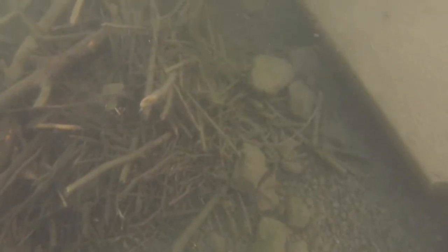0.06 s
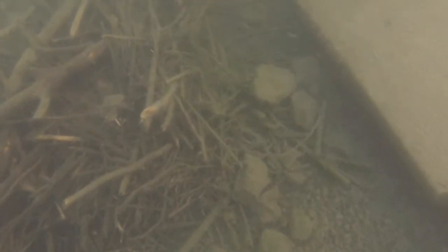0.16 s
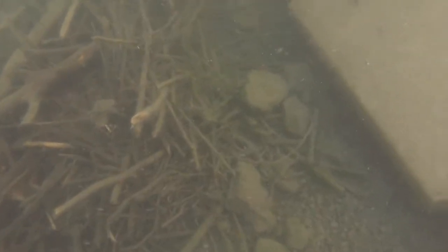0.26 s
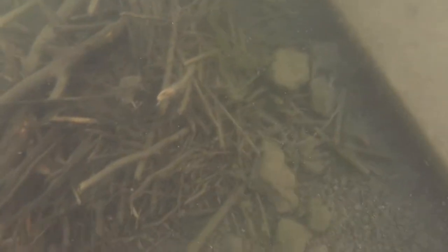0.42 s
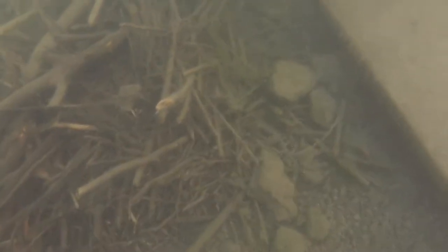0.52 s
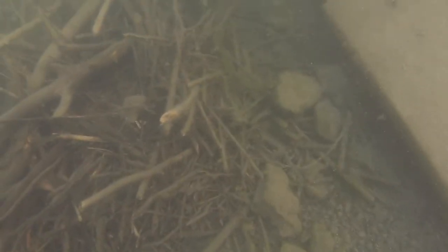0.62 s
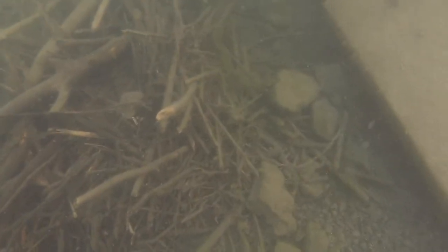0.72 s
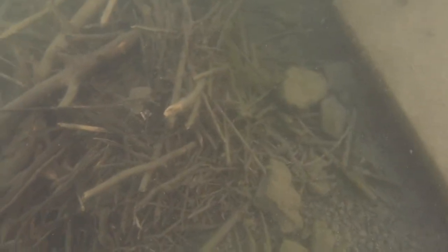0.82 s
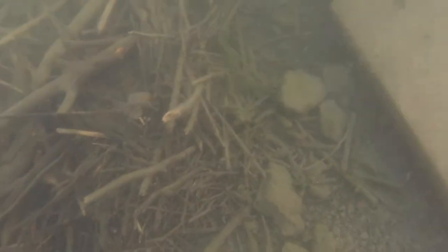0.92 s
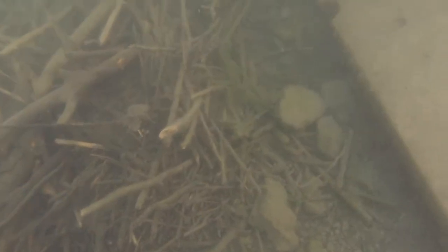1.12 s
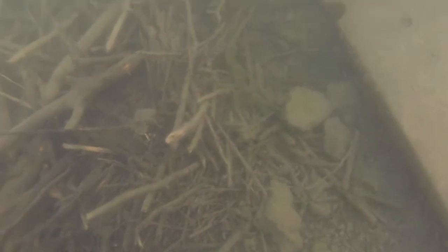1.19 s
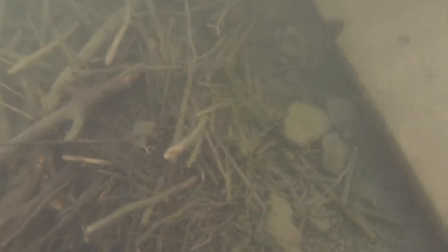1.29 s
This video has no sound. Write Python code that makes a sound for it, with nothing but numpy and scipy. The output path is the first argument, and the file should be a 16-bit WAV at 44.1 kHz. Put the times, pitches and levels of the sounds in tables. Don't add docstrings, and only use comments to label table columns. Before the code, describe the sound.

Hollow bubble glugs run quickly together and peak in a hard watery slap, then only weaker gurgles, light slosh and low pressure rumble remain, heard from inside a housing in shallow outdoor water.

```python
import sys
import numpy as np
from scipy import signal
from scipy.fft import rfft, irfft, next_fast_len
from scipy.io import wavfile
from scipy.ndimage import map_coordinates

SR = 44100
rng = np.random.default_rng(int(sys.argv[2]) if len(sys.argv) > 2 else 0)


def bounce(signal):
    frames = np.transpose(np.atleast_2d(signal))
    limited = np.clip(frames, -1, 1)
    pcm = np.round(limited * 32767).astype(np.int16)
    wavfile.write(sys.argv[1], SR, pcm)


def rack_gain(trim_db):
    fader = np.asarray(trim_db, float)
    return 10 ** (fader / 20)


N = 59535

# t/s, peak level/dB, f/Hz, swell time/s, time to fade by 60 dB/s
GLUGS = [(.081, -35, 659, 0.0014, 0.036), (.2135, -10, 688, 0.0024, 0.031),
         (.2275, -7.5, 664, 0.0019, 0.024), (.234, -12, 647, 0.0075, 0.077), (.247, -5.5, 700, 0.011, .014),
         (.265, -10, 786, 0.0058, 0.025), (.288, -23.5, 633, 0.0036, 0.08),
         (.312, -22.5, 664, 0.0067, 0.034), (.353, -14, 637, 0.0044, 0.058),
         (.381, -13.5, 643, 0.002, 0.021), (.3995, -4.5, 845, 0.0008, 0.031),
         (.4095, -4.5, 700, 0.00252, 0.0078), (.417, -17.5, 644, 0.0022, 0.088),
         (.498, -30, 810, 0.0019, 0.113), (.507, -25.5, 734, 0.007, 0.0079),
         (.534, -31.5, 706, 0.0024, 0.03), (0.756, -31.5, 564.3, 0.0073, 0.12),
         (.763, -26.5, 721, 0.009, 0.091), (.843, -25, 672, 0.0011, 0.052),
         (.851, -17, 663, 0.0045, 0.0041), (.865, -23, 700, 0.0037, 0.0084),
         (.872, -31.5, 685, 0.004, 0.085), (1.117, -21.5, 700, 0.0036, 0.012),
         (1.300, -25, 639, 0.0036, 0.015)]
# t/s, peak level/dB, f/Hz,
# swell time/s, 60 dB fade/s
BUBBLES = [(.002, -46.5, 719, 0.013, 0.034), (.150, -40, 746, 0.0067, 0.11),
           (0.2143, -22.5, 300, 0.0042, 0.088), (.408, -22, 290, 0.008, 0.12),
           (.270, -32.5, 1704, 0.00523, 0.011), (.300, -28, 300, 0.0071, 0.068),
           (0.374, -30, 119, 0.0042, 0.12), (0.549, -38.5, 444, 0.011, 0.073),
           (.693, -39.5, 560, 0.0031, 0.036), (.795, -36, 560, 0.011, 0.1), (.855, -39, 1746, 0.013, 0.093),
           (0.872, -27.5, 465, 0.0053, 0.099), (.988, -35, 520, 0.0029, 0.048),
           (1.047, -43, 197, 0.0032, 0.058), (1.092, -37.5, 530, 0.0012, 0.15),
           (1.117, -39.5, 1792, 0.0012, 0.08), (1.130, -44, 700, 0.0038, 0.022),
           (1.196, -33.5, 667, 0.00067, 0.019), (1.203, -31, 318.3, 0.012, 0.12),
           (1.23, -37.5, 1936, 0.00071, 0.097), (1.253, -34.5, 560, 0.0014, 0.099),
           (1.255, -35, 725, 0.0013, .05), (.528, -40.5, 285.5, 0.012, 0.14),
           (1.295, -37.5, 170, 0.0064, 0.03),
           (0.2133, -31, 1716, .002, .04), (0.23, -34, 1230, 0.0033, 0.034),
           (.232, -36, 1713, 0.0049, 0.065), (0.247, -30, 1350, 0.0031, 0.026),
           (.250, -32.5, 1720, 0.0047, 0.035), (.228, -20, 334, 0.0044, 0.06),
           (0.275, -20.5, 306, 0.0026, 0.031), (.258, -20, 865, 0.0023, 0.013),
           (.348, -20, 750, 0.0012, 0.061), (.349, -22, 3180, 0.0024, 0.004),
           (0.351, -27.5, 1405, .004, .04), (0.354, -22, 950, .004, .03), (.366, -22.5, 336, 0.0081, 0.023),
           (0.371, -40, 1210, 0.0045, 0.016), (.383, -23.5, 289, 0.004, 0.046),
           (.352, -26.5, 191, .006, 0.048), (.397, -10.5, 837, 0.0016, 0.021),
           (.399, -10.5, 560, 0.0039, 0.024), (0.3998, -11, 3364, .0012, 0.014),
           (.405, -5.5, 856, 0.0047, 0.032), (.416, -8.5, 831, 0.0028, 0.022),
           (0.419, -29, 1190, 0.0056, 0.023), (.431, -34, 3350, .0015, 0.016),
           (0.765, -32, 330, 0.0063, 0.03), (0.767, -40.5, 881, 0.0062, 0.043),
           (0.783, -35.5, 351, 0.01, 0.044), (.795, -41.5, 886, 0.008, .06), (.802, -37, 300, 0.011, 0.076),
           (.870, -27.5, 859, 0.004, 0.065), (0.879, -32, 297, 0.012, 0.058),
           (1.030, -57, 3540, 0.0052, 0.049), (.487, -43, 3290, .002, 0.056),
           (1.072, -48, 3000, 0.0054, 0.05), (1.128, -35, 837, 0.0044, 0.072),
           (1.27, -36, 345, .012, 0.055), (1.315, -43.5, 1564, 0.003, 0.049)]
# t/s, peak level/dB, hold/s, thud over crack/dB, spray over crack/dB
SLAPS = [(0.08, -41.5, 0.009, -17, 5.5), (0.187, -38, 0.0019, 3.5, -9), (0.2138, -31.5, 0.0014, 16.5, 0),
         (0.225, -40, 0.0013, -0.5, -5), (0.233, -32, 0.036, 12.5, 4.5), (0.287, -43, 0.0051, 15, 19.5),
         (0.348, -21, 0.0024, -19, 10.5), (0.594, -44, 0.0013, 4, 11), (0.381, -30.5, 0.001, -3, 16.5),
         (0.3956, -13.5, 0.0041, 4.5, 12), (0.399, -7, 0.0015, -1.5, 4), (0.4042, -16.5, 0.0025, -0.5, 5.5),
         (.411, -17.5, 0.0016, 2, 1.5), (0.432, -27.5, 0.0033, -12, 6), (0.488, -36.5, 0.018, 4.5, 4),
         (0.526, -39.5, 0.017, 5.5, 3.5), (0.7414, -34, 0.013, -2.5, 0), (0.7645, -32, 0.01, 3, 2.5),
         (0.8, -64, 0.0065, 12, -3), (0.838, -38.5, 0.036, 10, 6.5), (0.8712, -33, 0.0065, -5, -3),
         (0.931, -45, 0.014, -26, -3), (1.0256, -38.5, 0.0082, -4.5, 6.5), (1.051, -44.5, 0.041, -14, 4.5),
         (1.249, -38.5, 0.0083, 1.5, 5.5), (0.926, -50, .002, -13, 10), (1.089, -43, 0.0036, 6, 0),
         (1.111, -40, 0.018, -13, 7), (1.208, -42, .002, -6, -1), (1.294, -44, 0.0034, 12, 17)]
# t/s, level/dB
SLOSH = [(0, -63.5), (.12, -71), (.20, -54.5), (.23, -51), (.28, -41.5), (.44, -42), (.465, -61),
         (.56, -58), (.68, -64.5), (.735, -68.5), (.80, -53.5), (.83, -59.5), (.89, -74), (.93, -59.5),
         (1.07, -64), (1.11, -51), (1.19, -52.5), (1.35, -49)]
# t/s, level/dB
SURGE = [(0.0, -45), (0.154, -56), (0.176, -45.5), (0.364, -39), (0.39, -41.5), (0.574, -54),
         (0.608, -47.5), (0.684, -53), (0.702, -51.5), (0.812, -53.5), (0.902, -40), (1.0, -48.5),
         (1.026, -34.5), (1.104, -49.5), (1.128, -43.5), (1.254, -43), (1.292, -54), (1.35, -44)]
# f/Hz, width/Hz, level/dB
LOW_MODES = [(300, 63, -2), (560, 94, -2.5), (700, 93, -1.5), (858, 99, -5.5)]
# f/Hz, width/Hz, level/dB
MID_MODES = [(1230, 240, -0.5), (1698, 41.7, 7), (1828, 98, 1), (2370, 290, -11), (3183, 388, 1),
             (3707, 83, -4)]
# f/Hz, width/Hz, level/dB
TOP_MODES = [(5400, 243, 7.5), (7340, 480, 0.5), (8810, 500, 0.5), (10370, 600, -8.5), (13700, 3800, -14.5)]
WET_MODES = MID_MODES[:3] + [(2450, 200, -3.5)] + MID_MODES[4:]
# f/Hz, level per Hz/dB
RUMBLE = [(8.8, -28), (15, 2.5), (43, -1.5), (56, -9), (87, -9), (184, -14.5), (220, -25.5), (290, -36),
          (480, -120)]
# f/Hz, level per Hz/dB
HISS = [(120, -50), (250, -3.5), (1000, -17.5), (3200, -24), (4600, -31.5), (12300, -41), (14200, -41),
        (15400, -72)]

LOW_CUT_HZ, MID_CUT_HZ, TOP_CUT_HZ = 1180, 3050, 18000
MID_GROWS, TOP_GROWS = 0.58, 0.82


def unit(x):
    return x / np.sqrt(np.mean(x ** 2) + 1e-20)


def curve(rows):
    return np.interp(np.arange(N) / SR, *np.transpose(rows))


def wobble(rate_hz):
    knots = rng.standard_normal(1000)
    smooth = map_coordinates(knots, [np.arange(N) * rate_hz / SR], mode="wrap")
    return 2 * np.tanh(smooth / 2)


def filtered(x, response):
    length = next_fast_len(N + SR // 2)
    spectrum = rfft(x, length) * response(np.fft.rfftfreq(length, 1 / SR))
    return irfft(spectrum, length)[..., :N]


def coloured(points):
    f, db = np.transpose(points)

    def response(hz):
        return rack_gain(np.interp(np.log(hz + 1), np.log(f + 1), db))

    return unit(filtered(rng.standard_normal(N), response))


def shell(force, modes, cut_hz):
    def ring(f):
        total = 0
        for k, (centre, width, db) in enumerate(modes):
            damping = 1j * f * width
            total = total + (-1) ** k * rack_gain(db) * damping / (centre ** 2 - f ** 2 + damping)
        return total / (1 - (f / cut_hz) ** 2 + 1.3j * f / cut_hz)

    power = np.mean(np.abs(ring(np.linspace(0, SR / 2, num=4000))) ** 2)
    return filtered(force, ring) / np.sqrt(power)


def glugs():
    rise, level_db = 0.085, -1
    out = np.zeros(N + SR)
    t = np.arange(SR // 6) / SR
    for start, db, hz, swell, t60 in GLUGS + BUBBLES:
        opening = np.sin(np.pi / 2 * np.clip(t / swell, 0, 1)) ** 2
        fading = rack_gain(-60 * np.clip(t - swell, 0, None) / t60)
        life = np.clip(t / (swell + t60 / 2), 0, 2)
        phase = 2 * np.pi * np.cumsum(hz * (1 + rise * (life - 0.5))) / SR
        out[round(start * SR):][:len(t)] += rack_gain(db + level_db) * opening * fading * np.sin(phase)
    return out[:N]


def slaps():
    attack_s, t60_s, lumpy_db = 0.00014, 0.028, 3.5
    edge = 8.1
    thud_level_db, crack_level_db, spray_level_db = -6, -10.5, -34
    rush = np.zeros((3, N + SR))
    blows = np.zeros((3, N))
    t = np.arange(SR // 10) / SR
    for start, db, hold, thud_db, spray_db in SLAPS:
        first = round(start * SR)
        size = rack_gain(db + np.array([[thud_db], [0], [spray_db]]))
        fading = rack_gain(-60 * np.clip(t - hold, 0, None) / t60_s)
        rush[:, first:][:, :len(t)] += size * (1 - np.exp(-t / attack_s)) * fading
        blows[1:, first] = edge * size[1:, 0]
    lumps = unit(rng.standard_normal(N) * rack_gain(lumpy_db * wobble(600)))
    force = blows + rush[:, :N] * lumps
    thud = rack_gain(thud_level_db) * shell(force[0], LOW_MODES[1:], LOW_CUT_HZ)
    crack = rack_gain(crack_level_db) * shell(force[1], MID_MODES, MID_CUT_HZ)
    spray = rack_gain(spray_level_db) * shell(force[2], TOP_MODES, TOP_CUT_HZ)
    return thud + crack + spray


def slosh():
    drops_per_s, drop_spread_db, wash_share = 1600, 6, 0.65
    strength_db = curve(SLOSH)
    mean_db = strength_db.mean()
    swing_db = strength_db - mean_db + 0.74 * wobble(11.0)
    groups = [(LOW_MODES, LOW_CUT_HZ, 7.5, 1),  # modes, damping/Hz, level/dB, share of the swing
              (WET_MODES, MID_CUT_HZ, -2, MID_GROWS),
              (TOP_MODES, TOP_CUT_HZ, -21, TOP_GROWS)]
    out = 0
    for modes, cut_hz, db, grows in groups:
        chance, side, luck = rng.random((3, N))
        hits = chance < drops_per_s / SR
        drops = hits * np.sign(side - 0.5) * rack_gain(-drop_spread_db * np.log(luck + 0.016))
        force = unit((1 - wash_share) * unit(drops) + wash_share * rng.standard_normal(N))
        level_db = mean_db + db + grows * swing_db + 1.95 * wobble(46.2)
        out = out + shell(force * rack_gain(level_db), modes, cut_hz)
    return out


def fizz(count=170):
    centre_hz, pitch_spread, cycles, level_db = 2592, 0.422, 6.1, -14
    spread_db, cap = 4, 0.08
    draw = rng.random((count, 2))
    t = np.arange(SR // 25) / SR
    start = (draw[:, 0] * N).astype(int)
    hz = centre_hz * np.exp(pitch_spread * np.tanh(rng.standard_normal((count, 1))))
    strength_db = curve(SLOSH)
    mean_db = strength_db.mean()
    size_db = mean_db + MID_GROWS * (strength_db[start] - mean_db)
    size_db = size_db - spread_db * np.log(draw[:, 1] + cap)
    age = t * hz / cycles
    envelope = np.e * age * np.exp(-age)
    rings = rack_gain(size_db + level_db)[:, None] * envelope * np.sin(2 * np.pi * hz * t)
    places = start[:, None] + np.arange(len(t))
    force = np.bincount(places.ravel(), rings.ravel(), N + SR)[:N]
    return shell(force, WET_MODES, MID_CUT_HZ)


def rumble():
    sway_hz, sway_wander = 43.7, 0.18
    noise = rack_gain(-5 + 2.5 * wobble(11.13)) * coloured(RUMBLE)
    phase = 2 * np.pi * np.cumsum(sway_hz * np.exp(sway_wander * wobble(11))) / SR
    sway = rack_gain(1 + 4 * wobble(29.92)) * np.sin(phase)
    return rack_gain(curve(SURGE)) * (noise + sway)


def hiss():
    level_db, flutter_db = -57, 1.5
    return rack_gain(level_db + flutter_db * wobble(50)) * coloured(HISS)


def scene():
    mix = glugs() + slaps() + slosh() + fizz() + rumble() + hiss()
    return mix[None]


def roll_off(x):
    return signal.sosfilt(signal.butter(12, 15590, fs=SR, output="sos"), x)


def record(dry):
    ceiling, top_hz = 1.05, 15650
    held = dry / (1 + np.abs(dry / ceiling) ** 6) ** (1 / 6)
    mix = filtered(held, lambda hz: hz < top_hz)
    return roll_off(mix)


dry = scene()
out = record(dry)
bounce(out)
```